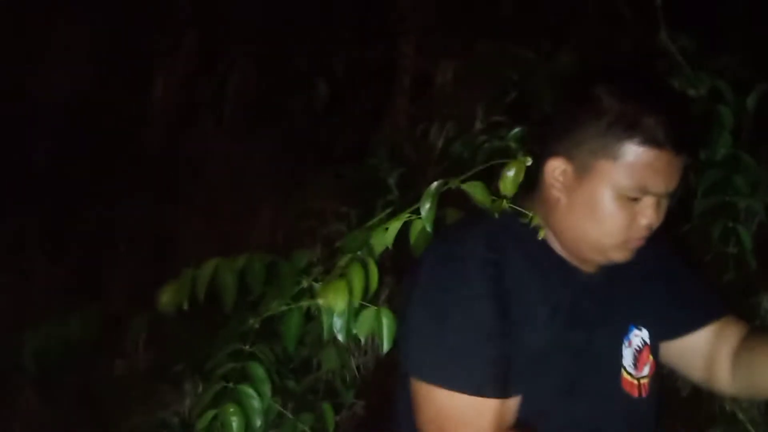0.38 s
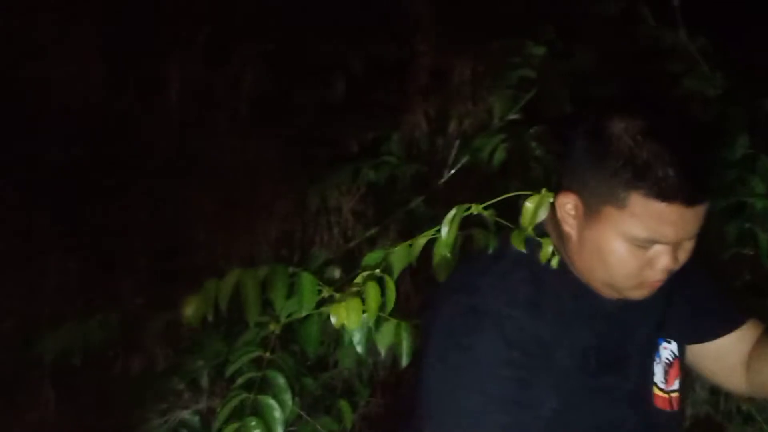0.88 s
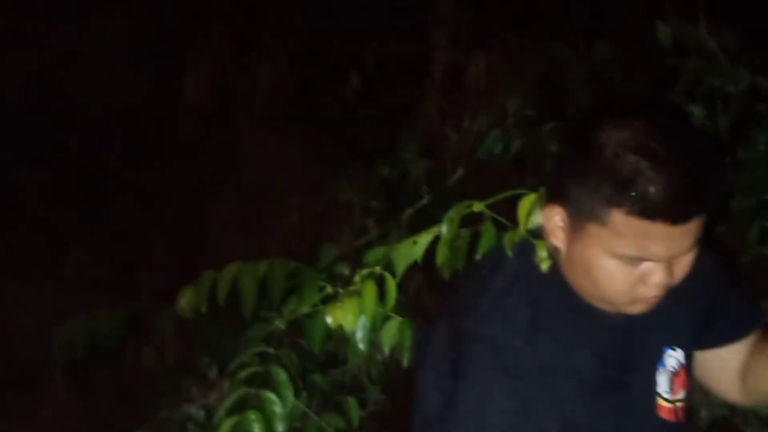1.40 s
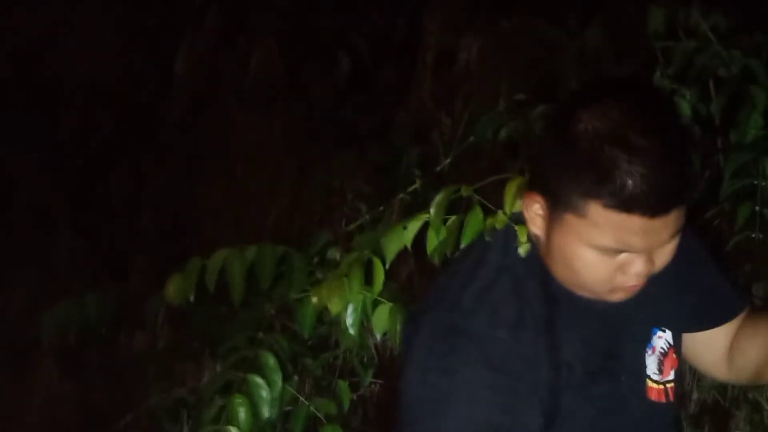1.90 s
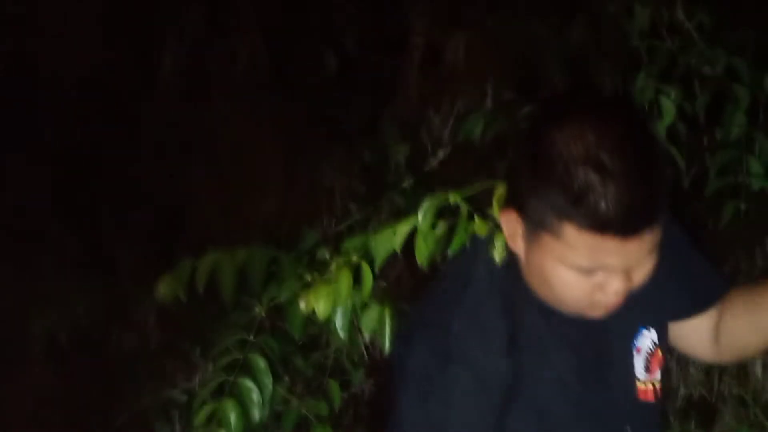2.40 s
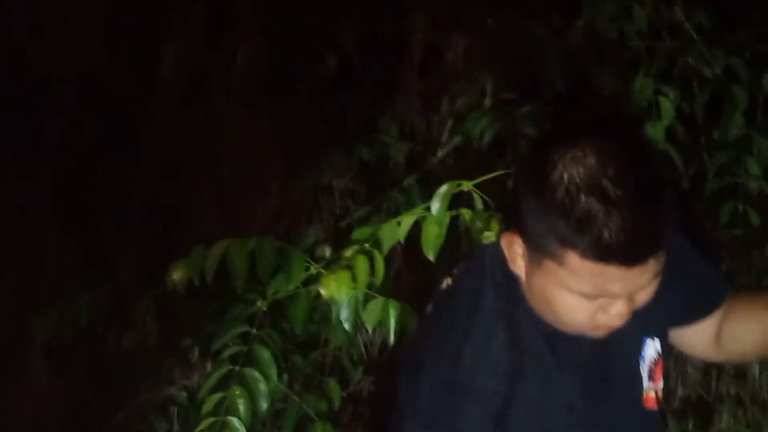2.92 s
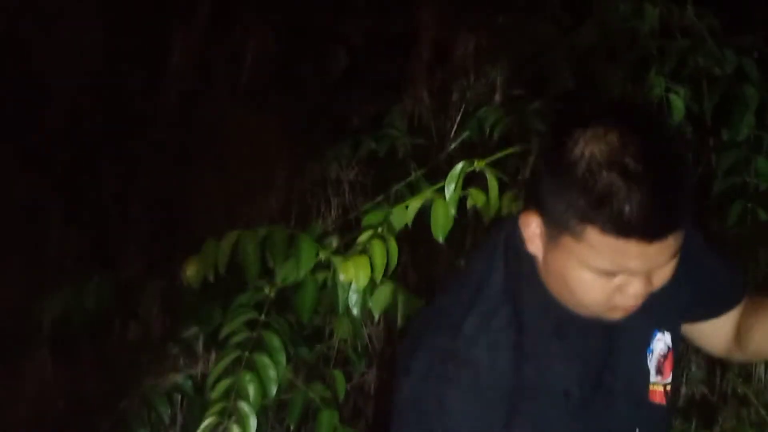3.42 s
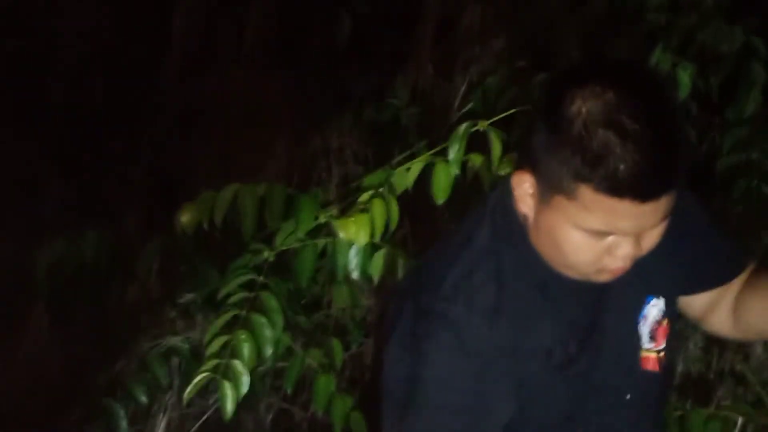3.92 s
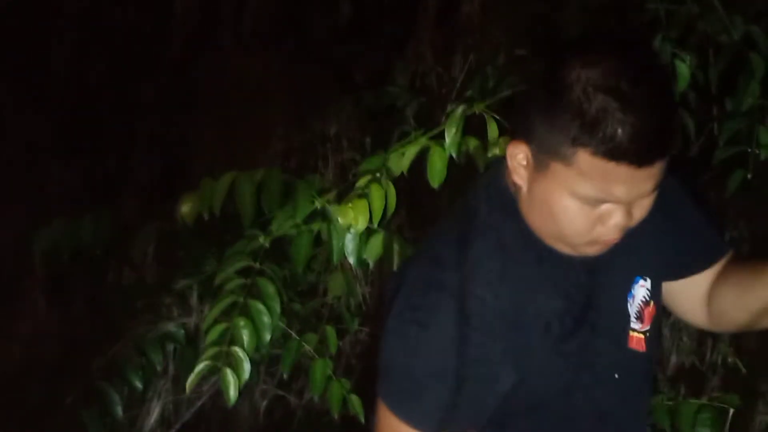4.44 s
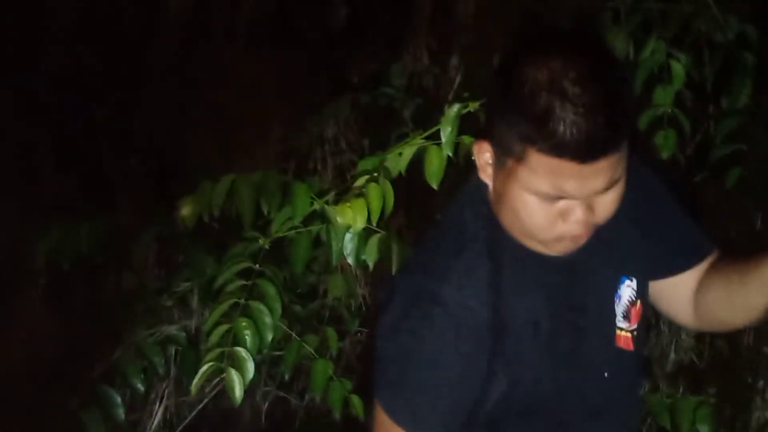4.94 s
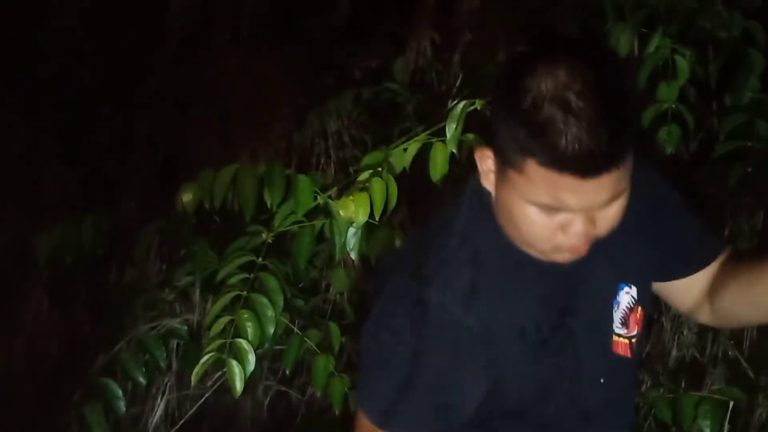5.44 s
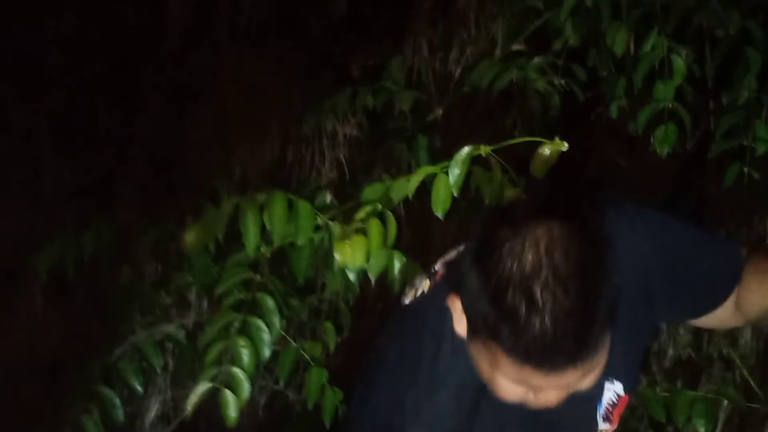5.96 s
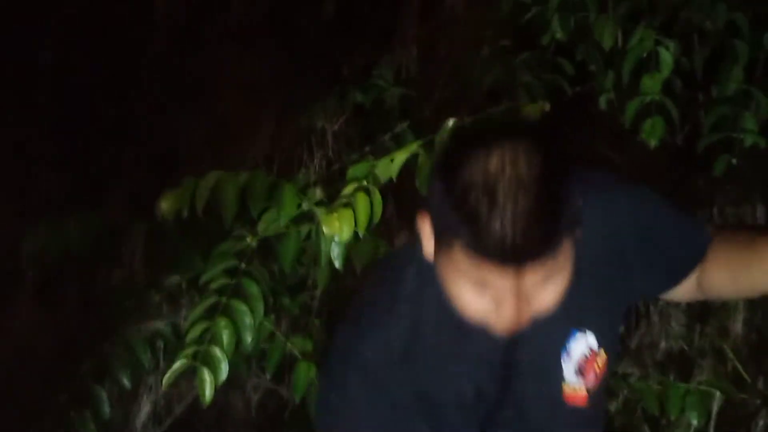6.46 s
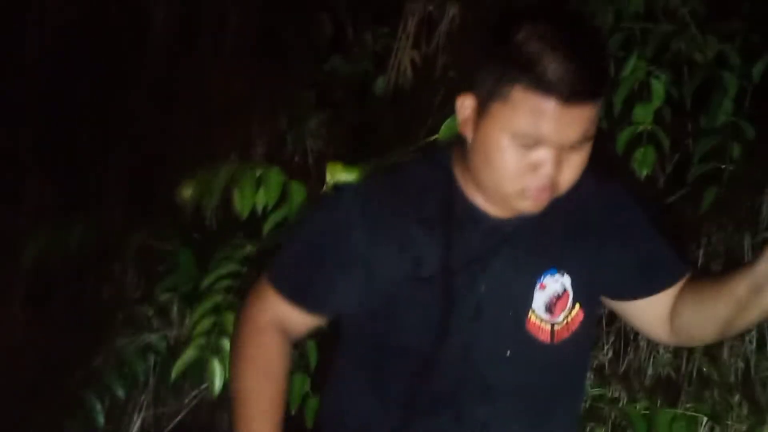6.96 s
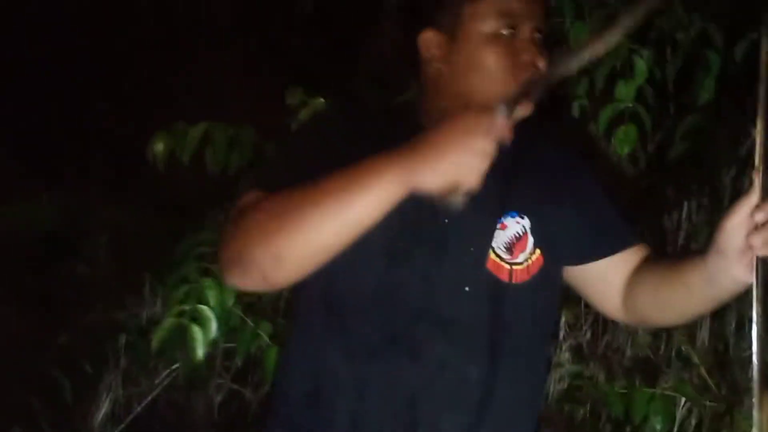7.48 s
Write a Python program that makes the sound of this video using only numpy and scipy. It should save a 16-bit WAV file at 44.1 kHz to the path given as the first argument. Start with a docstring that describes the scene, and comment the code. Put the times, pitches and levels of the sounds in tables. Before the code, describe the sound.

Among shrubs at night, a blade knocks a pole: one hard crack early, a cluster of medium knocks, then sparse ticks, another hard blow midway and one late. Leaves swish and settle after blows, and the stuck blade creaks briefly twice. Quiet insects chirp rapidly, a low engine drone sinks away, and faint electric ticking and small regular rasps remain. Narrow mono sound with slightly softened peaks.

```python
"""Among leafy shrubs at night, a long blade knocks, scrapes and creaks against a wooden pole.
Blows ring blade and pole, slips of the stuck blade creak, and shaped noise makes cracks and rustling leaves.
Insects chirp with short tones; an engine of wavering tones on multiples of its shaft rate slows down.
A thin electric buzz ticks about sixty times a second; rasps, soft pipes and coloured noise fill the night.
A noise suppressor turns quiet moments down, and the hardest peaks are rounded."""
import sys
import numpy as np
from scipy import signal
from scipy.fft import rfft, irfft
from scipy.io import wavfile
from scipy.ndimage import uniform_filter1d

SR = 44100
rng = np.random.default_rng(int(sys.argv[2]) if len(sys.argv) > 2 else 0)


def boost(x):
    """Linear amplitude factor 10**(x/20) for a level x in decibels (scalar or array-like)."""
    u = np.asarray(x, float) / 20
    return 10 ** u


def to_wav(s):
    """Save 16-bit WAV."""
    ch = np.atleast_2d(s).T  # columns
    pcm = np.round(np.clip(ch, -1, 1) * 32767)  # PCM
    wavfile.write(sys.argv[1], SR, pcm.astype(np.int16))


N = 335155   # length of the scene in samples

# Levels in the tables are starting levels: the functions add offsets, random spread or filters.
# Blade and wood contacts: start_s, level_db, thump_db and treble_db (re level),
# and for some rows rebound_gap_s, which adds two rebounds
KNOCKS = [(.442, -37.5, -34, -39), (.6879, -40, -25, -6), (.7096, -29, -38, -12), (.7307, -28, -36, -9),
          (.7569, 2.5, -25, -11, .016), (1.3815, -24, -36, -16.5), (1.3928, -25, -35, -13),
          (1.4898, -45, 9, -2), (1.5212, -11, -25, -10), (1.5299, -9, -26, -12),
          (1.553, -7.5, -21, -13, 0.0046), (1.5822, -20, -15.5, -3), (1.5973, -5, -24, -8),
          (1.7667, -31, -16, 0), (1.7832, -22, -21, -5), (1.9193, -16, -10, -16.5, .007),
          (2.3175, -46.5, -4, 3), (2.484, -34, -30, -6), (2.5232, -23, -51, -7), (2.6697, -15, -53, -12),
          (2.691, -26, -33, 0), (2.7869, -22, -41.5, -7.5), (3.3226, -24, -35.5, -35.5),
          (4.2573, -29, -36, -4), (4.7453, -9, -7, -10), (4.7547, 2.5, -26.5, -10, .007),
          (4.8204, -14, -30, -12), (5.4465, -14, -48, -7), (5.4995, -19, -41, -18.5),
          (5.6346, -28, -49, -7), (5.6492, -17, -59, -6), (6.0433, -29, -39, -13), (6.0717, -23, -33, -12),
          (6.129, -25, -42, -14), (6.1471, -25, -33, -14), (6.231, -14, -40, -11), (6.2541, -27, -33, -18),
          (6.2983, -33.5, -25.5, -2), (6.8048, 0.5, -33, -13, .004), (6.8609, -11, -19, -7),
          (6.905, -27.5, -36, -18), (6.9863, -32, -30, -4), (7.1444, -35, -25, -21.5),
          (7.237, -31, -47, -6), (7.3914, -26, -31, -13)]
# Ways the pole rings: pitch_hz, level_db, longest_t60_s (time to die by 60 dB)
POLE_MODES = [(405, -12, .05), (1250, -10, .03), (489, -7.5, 0.029), (651, -2.5, 0.072), (705.4, 3, 0.044),
              (825, 0, 0.029), (944.3, -4, 0.04), (1043, 0.5, 0.032)]
# Ways the split surface and blade ring: pitch_hz, level_db, longest_t60_s
BLADE_MODES = [(2120, -9.5, 0.022), (2430, -2.5, 0.0089), (2770, -5, .03), (3390, -2.5, 0.043),
               (3902, -3, .02), (4530, -0.5, 0.06), (5210, -4.5, 0.0087), (5650, -5, 0.053),
               (6026, -3, 0.075), (6710, -1, 0.06), (7500, -13.5, 0.012), (8900, -12.5, 0.0073)]
# Colour of leaves and dry wood: frequency_hz, level_db (per Hz)
LEAF_COLOUR = [(710, -56), (1200, -32.5), (1460, -13.5), (1660, -18), (2760, -1.5), (4860, 0), (5710, 1),
               (6580, -2.5), (9510, -15), (10400, -31.5), (13500, -33), (15200, -28), (16000, -38.5)]
# Blade slipping in the cut, one list for each creak: time_s, rate_slips_per_s, level_db
CREAKS = [
    [(3.830, 150, -28), (3.86, 260, -24), (3.897, 240, -24), (3.905, 110, -33), (3.94, 60, -37)],
    [(5.660, 120, -26), (5.685, 150, -17), (5.70, 160, -15.5), (5.72, 140, -26)],
]
# Strokes of blade and arm through leaves: start_s, length_s, rustle_db, dull_db (re rustle)
STROKES = [(.003, 0.15, -54, -5), (0.09, 0.13, -44, -6.5), (.56, 0.15, -52.5, -0.5),
           (1.2, .18, -43.5, -17.5), (2.118, 0.16, -42, -10), (2.288, 0.066, -54.5, -1),
           (2.524, 0.14, -57, -36), (3.196, 0.16, -63.5, -7.5), (4.541, 0.31, -64.5, -10.5),
           (5.123, 0.28, -53, -25), (5.346, 0.25, -34, -31), (5.644, 0.079, -33, -33),
           (6.094, 0.13, -43.5, -26), (6.185, 0.097, -48.5, -20), (6.278, .1, -50.5, -21.5),
           (7.372, 0.089, -49.5, -27)]
# Leaves settling after a blow: start_s, length_s, rustle_db
SHAKES = [(0.683, .13, -48), (0.815, 0.48, -59), (1.377, 0.096, -47.5), (2.47, 0.36, -60.5),
          (4.265, 1, -69), (4.778, 0.18, -40.5), (4.889, 0.17, -49.5), (6.813, 0.25, -39.5),
          (6.98, 0.044, -46.5), (7.127, 0.18, -55.5), (7.234, 0.099, -57.5)]
# Chirps of the near insect, evenly paced between rows: time_s, chirps_so_far
CHIRP_COUNTS = [(.041, 0), (.61, 5), (.712, 6), (.838, 7), (.986, 8), (1.661, 14), (2.128, 18), (2.571, 22),
                (2.805, 24), (3.586, 31), (4.269, 37), (4.707, 41), (5.058, 44), (6.62, 58), (6.94, 61),
                (7.495, 66)]
# Tones of one chirp: multiple, level_db, top_s (from the chirp's time), rise_db_per_ms, fall_db_per_ms
CHIRP_PARTIALS = [(1, 3, -.001, 1.16, 2.5), (2, -3, .004, 1.4, 1.25), (3, 2, .003, 1.17, 2)]
# Engine: time_s, shaft_hz, level_db (of the favoured multiples), favoured_hz
ENGINE = [(0, 42.1, -48, 247), (.2, 42.0, -59, 155), (.5, 42.0, -58, 174), (.65, 42.0, -50.5, 126),
          (.85, 41.8, -53, 150.6), (1.4, 41.6, -52, 179), (1.55, 41.5, -58, 224), (1.95, 41.0, -64, 240),
          (2.25, 40.1, -60.5, 151), (3.45, 37.6, -66.5, 139), (3.65, 37.3, -83, 200),
          (4.2, 37.0, -72, 168.3), (4.56, 37.0, -66, 160), (4.85, 37.2, -65.5, 145), (6.0, 37.4, -71, 157),
          (7.6, 37.5, -72.5, 190)]
# Engine tones that follow the favoured pitch: multiple, level_db
ENGINE_MULTIPLES = [(2, -0.5), (3, 1), (4, -5.5), (5, -1), (6, 0.5), (7, -17)]
# Engine tones near the exhaust pipe's pitch: multiple, level_db (re the engine)
EXHAUST_MULTIPLES = [(13, -21), (14, -16), (15, -15)]
# Engine booming on one pitch for a while: start_s, end_s, level_db, pitch_hz
BOOMS = [(.84, 1.42, -57, 615), (4.4, 4.7, -57, 148)]
# Runs of the buzz, with a skip between runs: first_tick_s, level_db
BUZZ_RUNS = [(.01048, -44), (1.75945, -46.5), (6.79591, -46.5)]
# Far piping notes: start_s, length_s, starting_pitch_hz, level_db
PIPES = [(0.565, 0.02, 1467, -54), (2.093, 0.021, 1480, -62), (3.977, 0.055, 1490, -65.5),
         (6.32, 0.042, 1410, -61.5), (7.447, 0.052, 1520, -68)]
# Distant crickets: pitch_hz, level_db
CHORUS = [(4200, -70), (6000, -71.5), (6800, -68), (8100, -75)]
# Colour of the night noise: frequency_hz, level_db (per Hz)
NIGHT_COLOUR = [(18, -38), (30, -12), (60, 0), (165, 7.5), (311, 1.5), (866, -6.5), (2230, -33), (2750, -8),
                (3060, -31), (4080, -13), (5040, -22.5), (5450, -22.5), (6380, -10), (8080, -6),
                (10200, -30), (13300, -36), (14800, -25), (16000, -29)]
# Shared swell of insects and night noise: time_s, level_db
SURROUNDINGS = [(0, 4), (1.4, 4.5), (2.8, 0.5), (4.1, -1), (5.3, -1), (7.6, -2)]

# Blows: each rebound bites less while its thump loses less
REBOUND_LOSS_DB, REBOUND_THUMP_GAIN_DB = 8, 4
RING_DB, THUMP_DB, CRACK_DB, TAIL_DB = -14.5, -7, -14, -26   # offsets to a blow's level
CRACK_T60_S, TAIL_T60_S = 0.028, 0.11
AIR_DB, AIR_FOLLOWS = 9.5, .9   # top octave of a crack, and how steeply it follows the treble
# Leaves: harder rustles are brighter above 11.5 kHz, unchanged at AIR_EVEN_DB
AIR_BEND, AIR_EVEN_DB = 1.6, -46
STROKE_RISE_SHARE = .45   # part of a stroke's length spent rising
SHAKE_RISE_S, SHAKE_DULL_DB = 0.014, -16.5
# Near insect: the pitch glides up from low to high; times are from the chirp's time
CHIRP_DB, CHIRP_LOW_HZ, CHIRP_HIGH_HZ = -57, 2460, 2768.5
GLIDE_AT_S, GLIDE_S = -0.0044, 0.0022
# Engine
FALL_DB_PER_OCTAVE = 10.5   # away from the favoured pitch
WAVER_DB, WAVER_RAD, WAVER_RATE_HZ = 3.0, .07, 4   # angle is multiplied by the tone's multiple
BOOM_EDGE_S, BOOM_FALL_DB_PER_OCTAVE, BOOM_SAG_DB_PER_S = .08, 60, 7.0
# Background
BUZZ_HZ = 59.8875
RASP_FIRST_S, RASP_EVERY_S, RASP_DB = .512, 1.0172, -31
NIGHT_DB, NIGHT_SWAY_DB = -65.5, 2.5   # before the shared swell
PEAK_CEILING = .9   # rounded peaks stay below this, before the top is cut


def rms_one(x):
    """Scale a sound to an average strength (rms) of 1."""
    return x / np.sqrt(np.mean(x ** 2) + 1e-20)


def in_time(rows):
    """Draw straight lines between table rows: one curve for each column after the time."""
    time_s, *columns = np.transpose(rows)
    return [np.interp(np.arange(N) / SR, time_s, column) for column in columns]


def band(x, low_hz, high_hz):
    """Keep mainly the frequencies between two limits."""
    return signal.sosfilt(signal.butter(2, [low_hz, high_hz], "band", fs=SR, output="sos"), x)


def colour(x, spectrum):
    """Filter with the given spectrum, responding as early as possible (minimum phase)."""
    hz, db = np.transpose(spectrum)
    grid_hz = np.maximum(np.fft.rfftfreq(4096, 1 / SR), 1)
    log_gain = np.interp(np.log(grid_hz), np.log(hz), db) * np.log(10) / 20
    cepstrum = irfft(log_gain)
    # Folding the second half onto the first leaves no response before time zero
    cepstrum[1:2048] *= 2
    cepstrum[2049:] = 0
    response = irfft(np.exp(rfft(cepstrum)))
    return signal.fftconvolve(x, response)[:N]


def drift(rate_hz):
    """Random wandering with spread 1, computed every 40 samples and joined by lines."""
    r = np.exp(-80 * np.pi * rate_hz / SR)
    noise = rng.standard_normal(N // 40 + 2002)
    slow = signal.lfilter([1], [1, -2 * r, r * r], noise)[2000:]
    return np.interp(np.arange(N) / 40, np.arange(len(slow)), rms_one(slow))


def spikes(times_s, sizes):
    """Put one-sample clicks of the given sizes at the given times."""
    out = np.full(N, 1e-18)
    at = np.round(np.asarray(times_s) * SR).astype(int)
    inside = at < N
    np.add.at(out, at[inside], np.broadcast_to(sizes, at.shape)[inside])
    return out


def dying(clicks, t60_s):
    """Let each click fade smoothly, losing 60 dB in t60_s."""
    return signal.lfilter([1], [1, -boost(-60 / (t60_s * SR))], clicks)


def ring(clicks, hz, t60_s):
    """Let each click start a fading tone, like a small bell."""
    r = boost(-60 / (t60_s * SR))
    w = 2 * np.pi * hz / SR
    return signal.lfilter([0, np.sin(w)], [1, -2 * r * np.cos(w), r * r], clicks)


def strike(modes, times_s, db, spread_db):
    """Every contact rings all modes, each with its own random strength and sign; db is (contact, mode)."""
    luck = rng.standard_normal((len(times_s), len(modes), 2))
    out = 0
    for k, (hz, level_db, t60_s) in enumerate(modes):
        strength = boost(db[:, k] + level_db + spread_db * luck[:, k, 0])
        clicks = spikes(times_s, strength * np.sign(luck[:, k, 1]))
        out = out + ring(clicks, hz, min(t60_s, 70 / hz))   # at most 70 / hz seconds
    return out


def contact(x):
    """A contact of finite length carries little below the surface modes or above the blade's."""
    return band(band(x, 1700, 13000), 1400, 13000)


def splinters():
    """Uneven tearing noise with the colour of leaves and dry wood; rms 1."""
    return rms_one(colour(rng.standard_normal(N) * boost(3.7 * drift(480)), LEAF_COLOUR))


def patches(x, patchy_db, rate_hz, count):
    """Neighbouring treble bands flicker on their own, as leaves of many sizes take turns."""
    edges_hz = np.geomspace(900, 16500, count + 1)
    out = 0
    for k, (low_hz, high_hz) in enumerate(zip(edges_hz, edges_hz[1:])):
        # Alternating signs let neighbouring bands join without cancelling at their edges
        out = out + boost(patchy_db * drift(rate_hz)) * band(x, low_hz, high_hz) * (-1) ** k
    return out


def foliage(x, t60_s, db):
    """Scattered echoes from leaves and trunks: a sparse dying tail added to the sound."""
    t = np.arange(round(t60_s * SR)) / SR
    chosen = rng.standard_normal(len(t)) * (rng.random(len(t)) < .02)
    tail = chosen * boost(-60 * t / t60_s) * (t > .006)
    return x + boost(db) * signal.fftconvolve(x, tail / np.sqrt(np.sum(tail ** 2)))[:N]


def knocks():
    """Blows ring the blade, thump the pole and splinter wood with a crack and a longer leafy tail."""
    blows = []
    for start_s, level_db, thump_db, treble_db, *gap_s in KNOCKS:
        for k in range(1 + 2 * len(gap_s)):   # the blow and any rebounds
            blows.append((start_s + k * sum(gap_s), level_db - k * REBOUND_LOSS_DB,
                          thump_db + k * REBOUND_THUMP_GAIN_DB, treble_db))
    s, db, thump_db, treble_db = np.transpose(blows)

    high = np.array(BLADE_MODES)[:, 0] > 4200   # only these modes follow the treble level
    blade_db = db[:, None] + RING_DB + high * (treble_db[:, None] + 12.5)
    blade = strike(BLADE_MODES, s, blade_db, spread_db=2.5)
    pole_db = (db + thump_db)[:, None] + THUMP_DB + np.zeros(len(POLE_MODES))
    pole = strike(POLE_MODES, s + 0.0011, pole_db, spread_db=3.0)   # answers 1.1 ms later
    out = contact(blade) + band(pole, 300, 1800)

    tearing = patches(splinters(), patchy_db=3.5, rate_hz=87.0, count=6)
    air_db = db + AIR_FOLLOWS * treble_db + AIR_DB
    crack_bands = ((db, 1100, 4200), (db + treble_db + 10.5, 4200, 11500), (air_db, 11500, 16500))
    for level_db, low_hz, high_hz in crack_bands:
        clicks = spikes(s, boost(level_db))
        fading = boost(CRACK_DB) * dying(clicks, CRACK_T60_S) + boost(TAIL_DB) * dying(clicks, TAIL_T60_S)
        bite = signal.lfilter([.08], [1, -.92], fading)   # the edge bites in .3 ms
        out += bite * band(tearing, low_hz, high_hz)
    return out


def creaks():
    """Stick and slip: nearly even slips tear fibres and ring the blade and, weaker, the pole."""
    out, tears = 0, 0
    for rows in CREAKS:
        s, per_s, db = np.transpose(rows)
        fine_s = np.arange(s[0], s[-1], 1 / SR)
        turns = np.cumsum(np.interp(fine_s, s, per_s)) / SR
        slips_s = fine_s[np.diff(np.floor(turns), prepend=-1) > 0]   # one slip for each whole turn
        level_db = np.interp(slips_s, s, db)[:, None]
        blade = strike(BLADE_MODES, slips_s, level_db - 15 + np.zeros(len(BLADE_MODES)), spread_db=5.0)
        pole = strike(POLE_MODES[-2:], slips_s, level_db - 25.0 + np.zeros(2), spread_db=-5.0)
        out = out + contact(blade) + band(pole, 1014, 1700)
        tears = tears + spikes(slips_s, boost(level_db[:, 0] - 10.5))
    return out + dying(tears, 0.022) * band(splinters(), 1460, 9000)


def rustle():
    """Strokes swell, shakes start fast: uneven grains, bright from the leaves and dull from the wood."""
    t, bright, low = np.arange(N) / SR, np.zeros(N), np.zeros(N)
    moves = [(s, STROKE_RISE_SHARE * length, length, db, dull_db, 1.28)
             for s, length, db, dull_db in STROKES]
    moves += [(s, SHAKE_RISE_S, length, db, SHAKE_DULL_DB, 1.6) for s, length, db in SHAKES]
    for start, rise, length, db, dull_db, bend in moves:
        span = slice(max(round(start * SR), 0), round((start + length) * SR))
        shape = np.interp(t[span], [start, start + rise, start + length], [0, 1, 0])
        swell = boost(db) * shape ** bend
        bright[span] += swell
        low[span] += boost(dull_db) * swell

    born = rng.random(N) < 1200 * boost(7 * drift(40)) / SR   # chance of a grain in each sample
    sizes = boost(4.0 * np.minimum(rng.exponential(1, N), 3))
    grains = rms_one(born * sizes * rng.choice([-1, 1], N))
    grains = grains + .5 * rng.standard_normal(N)
    leaves = rms_one(patches(colour(grains, LEAF_COLOUR), patchy_db=4.0, rate_hz=20.0, count=12))
    dull = rms_one(band(band(rng.standard_normal(N), 600, 920), 550, 1200))
    air = bright * (bright / boost(AIR_EVEN_DB)) ** (AIR_BEND - 1)
    return bright * band(leaves, 500, 11500) + air * band(leaves, 11500, 16500) + low * dull


def near_insect():
    """A rising chirp of three related tones, a little different each time, with leafy echoes."""
    out, t = np.zeros(N + SR), np.arange(-.03, .03, 1 / SR)
    s, count = np.transpose(CHIRP_COUNTS)
    times_s = np.interp(np.arange(count[-1] + 1), count, s)
    glide = (1 + np.tanh((t - GLIDE_AT_S) / GLIDE_S)) / 2
    hz = CHIRP_LOW_HZ + (CHIRP_HIGH_HZ - CHIRP_LOW_HZ) * glide
    edge = np.clip((.02 - np.abs(t)) / .005, 0, 1)   # the wing starts and stops
    for chirp_s, luck in zip(times_s, rng.standard_normal((len(times_s), 4))):
        turn = 2 * np.pi * np.cumsum(hz * (1 + 0.0074 * luck[0])) / SR
        note = 0
        for i, (k, db, top, rise, fall) in enumerate(CHIRP_PARTIALS):
            slope_db = 1000 * np.minimum(rise * (t - top), fall * (top - t))   # per ms to per s
            note = note + boost(db + slope_db + 2.2 * luck[1 + i]) * np.sin(round(k) * turn)
        at = round((chirp_s + t[0]) * SR)
        out[at:at + len(t)] += boost(CHIRP_DB) * edge * note
    out = out[:N] * boost(4.0 * drift(150))   # the wing trembles, which blurs the tones
    # The treble is added once more, with stronger echoes
    return foliage(out, 0.12, -8.5) + foliage(band(out, 6500, 11000), .16, 3.0)


def engine():
    """Rough, wavering multiples of the shaft rate; a boom lifts those near its pitch."""
    hz, level_db, favoured_hz = in_time(ENGINE)
    t, turn, out = np.arange(N) / SR, 2 * np.pi * np.cumsum(hz) / SR, 0
    gains = []
    for k, db in ENGINE_MULTIPLES:
        octaves_away = np.abs(np.log2(k * hz / favoured_hz))
        gains.append((k, boost(db + level_db - FALL_DB_PER_OCTAVE * octaves_away)))
    gains += [(k, boost(db + level_db)) for k, db in EXHAUST_MULTIPLES]
    for k, gain in gains:
        for start, end, db, boom_hz in BOOMS:
            load = np.clip(np.minimum(t - start, end - t) / BOOM_EDGE_S + .5, 0, 1)
            sag_db = BOOM_SAG_DB_PER_S * (t - start) * (load > 0)
            octaves_away = abs(np.log2(k * hz[round(start * SR)] / boom_hz))
            gain = gain + load * boost(db - sag_db - BOOM_FALL_DB_PER_OCTAVE * octaves_away)
        phase = k * (turn + WAVER_RAD * drift(WAVER_RATE_HZ)) + rng.uniform(0, 2 * np.pi)
        waver = boost(WAVER_DB * drift(WAVER_RATE_HZ))
        out = out + np.sqrt(2) * gain * waver * np.sin(phase)
    return out


def buzz():
    """A short downward step and back, sharp at both edges, at a steady beat."""
    ends_s = [s for s, db in BUZZ_RUNS[1:]] + [N / SR]
    ticks = 0
    for (s, db), end_s in zip(BUZZ_RUNS, ends_s):
        ticks = ticks + spikes(np.arange(s, end_s - .004, 1 / BUZZ_HZ), -boost(db))
    step = np.convolve(ticks * boost(2.2 * drift(40)), np.ones(16))[:N]   # 16 samples long
    body = boost(-2.0) * band(step, 250, 1800)
    return body + boost(0.5) * band(step, 1800, 6000) + boost(-14) * band(step, 6900, 7300)


def rasps():
    """At an even pace, a short burst of clicks at 690 a second."""
    pulses = 0
    for s in np.arange(RASP_FIRST_S, N / SR, RASP_EVERY_S):
        pulses = pulses + spikes(s + np.arange(0, .016, 1 / 690), boost(RASP_DB))
    return band(band(pulses, 1700, 6400), 1360, 7400)


def far_pipes():
    """Soft piping notes that swell, fade and glide upward."""
    out, t = np.zeros(N), np.arange(N) / SR
    for s, length, hz, db in PIPES:
        since, at = t[:round(length * SR)], round(s * SR)
        swell = np.sin(np.pi * since / length)
        out[at:at + len(since)] += boost(db) * swell * np.sin(2 * np.pi * hz * since * (1 + 1.3 * since))
    return out


def far_cricket():
    """Pure pulses near 7.3 kHz, some ten a second, swelling and fading."""
    beat = np.cumsum(9.9 * (1 + 0.074 * drift(2.3))) / SR
    pulse = np.clip(np.sin(2 * np.pi * beat) + 0.16, 0, 1)
    tone = np.sin(2 * np.pi * np.cumsum(7290 * (1 + 0.0091 * drift(30))) / SR)
    return boost(-67.5 + 2.7 * drift(1.4)) * pulse * tone


def far_chorus():
    """Distant crickets: short pure pulses at scattered pitches."""
    out = 0
    for hz, db in CHORUS:
        pulses = np.clip(drift(25) - .9, 0, 2)   # only the peaks of the wandering are heard
        tone = np.sin(2 * np.pi * np.cumsum(hz * (1 + 0.0029 * drift(53))) / SR)
        out = out + boost(db) * pulses * tone
    return out


def night_noise():
    """Steady random noise with the colour of the night, swaying a little in level."""
    noise = rms_one(colour(rng.standard_normal(N), NIGHT_COLOUR))
    return boost(NIGHT_DB + NIGHT_SWAY_DB * drift(4.3)) * noise


def scene():
    """Mix the work on the pole with its surroundings, as one channel."""
    work = foliage(knocks() + creaks(), 0.19, -17) + rustle()
    insects = near_insect() + far_cricket() + far_chorus()
    swell_db, = in_time(SURROUNDINGS)
    surroundings = boost(swell_db) * (insects + night_noise())
    return (work + engine() + buzz() + rasps() + far_pipes() + surroundings)[None]


def band_limit(x):
    """A steep low-pass at the top of the band."""
    return signal.sosfilt(signal.butter(12, 16810, fs=SR, output="sos"), x)


def record(dry):
    """A noise suppressor lowers the gain when the treble is quiet; peaks are rounded and the top is cut."""
    power = np.abs(uniform_filter1d(band(dry[0], 1800, 6100) ** 2, size=2000))
    active = np.clip((10 * np.log10(power + 1e-12) + 68) / 14, 0, 1)   # 0 quiet, 1 busy
    r = np.exp(-1 / (0.0062 * SR))   # the gain follows with a 6.2 ms lag
    gain_db = 6.58 * (signal.lfilter([1 - r], [1, -r], active) - 1)
    rounded = PEAK_CEILING * np.tanh(dry * boost(gain_db) / PEAK_CEILING)
    top_cut = signal.cheby2(10, 60, 16800, fs=SR, output="sos")
    return band_limit(signal.sosfilt(top_cut, rounded))


dry = scene()
out = record(dry)
to_wav(out)
```